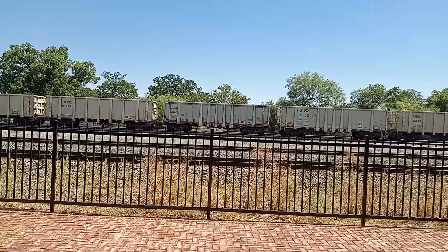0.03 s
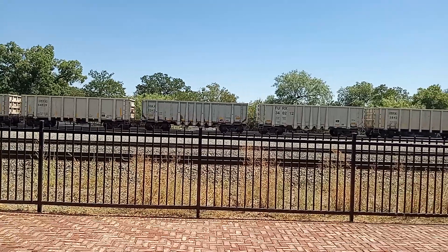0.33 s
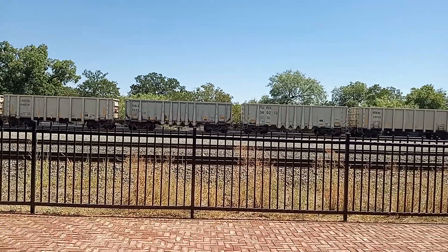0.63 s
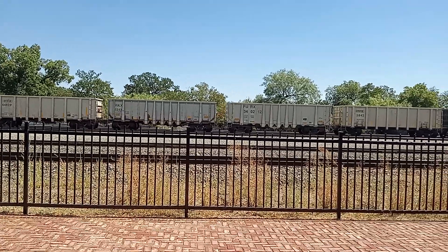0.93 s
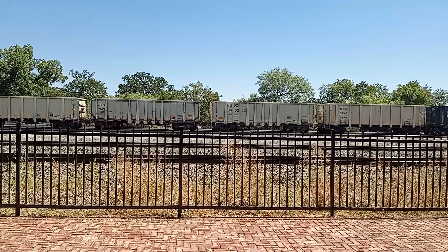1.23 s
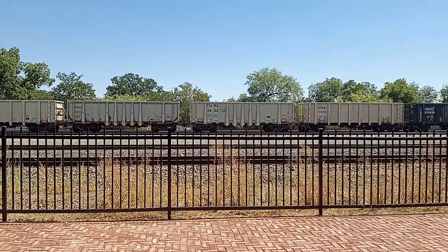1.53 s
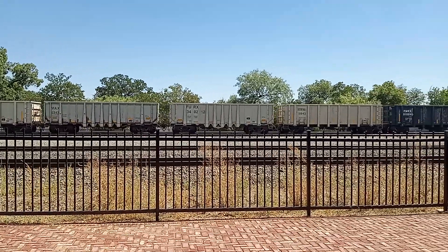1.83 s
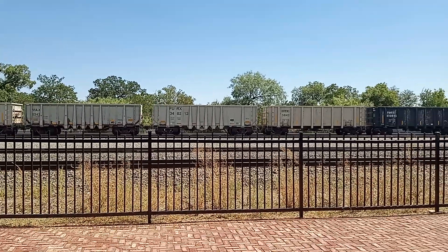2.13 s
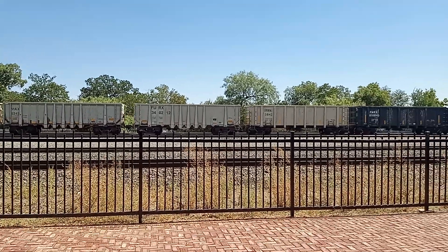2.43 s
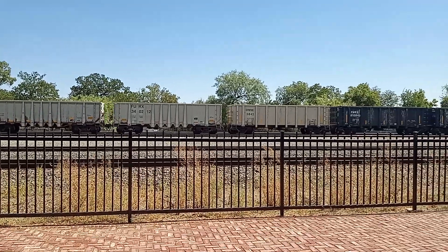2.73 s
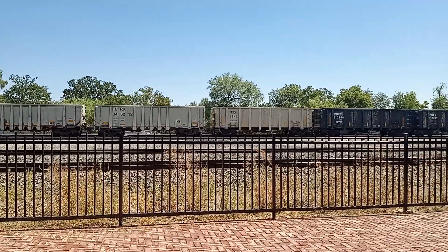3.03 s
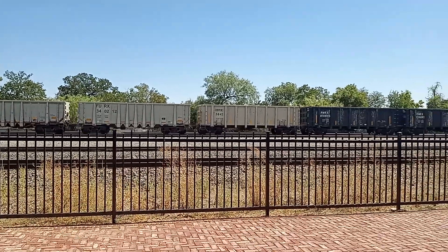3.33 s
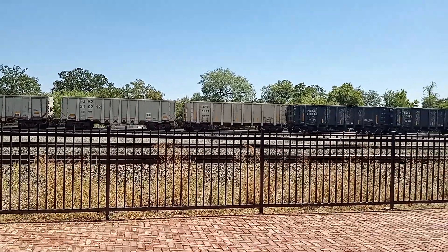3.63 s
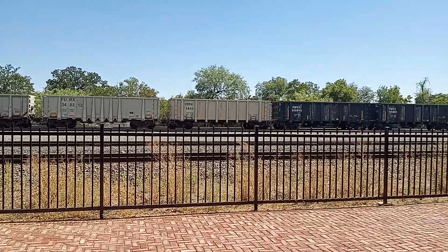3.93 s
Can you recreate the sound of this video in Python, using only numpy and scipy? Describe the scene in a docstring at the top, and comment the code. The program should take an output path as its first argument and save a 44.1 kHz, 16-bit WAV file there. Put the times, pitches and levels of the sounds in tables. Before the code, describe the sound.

A freight train rolls slowly by outdoors, with a steady low rumble and steely wheel hiss throughout. Wheels clack and ring unevenly over a rail joint until about 2.5 seconds, most clearly near 0.8, 1.2, 1.9 and 2.4 seconds. Faint squeaks come near 1.9 seconds and at the end. From about 2.8 seconds, wind gusts buffet the microphone, mostly on the right, over the rumble.

```python
"""Slow freight train behind a fence

A freight train rolls across a rail yard over a bed of wagon rumble and steely wheel hiss.
Rolling wheels sing, flanges squeak faintly and couplings knock. Up front, wheels drop at a
rail joint: the bogie crashes and rattles, the wagon thuds and the wheel rings on.
Towards the end gusts buffet the microphone, mostly its right port."""
import sys
import numpy as np
from scipy import signal
from scipy.fft import rfft, irfft
from scipy.io import wavfile
from scipy.ndimage import uniform_filter1d

SR = 44100
rng = np.random.default_rng(int(sys.argv[2]) if len(sys.argv) > 2 else 0)


def wav_out(sig):
    """Save sig, one row per channel (or a flat mono array), as 16-bit PCM at SR to the path in sys.argv[1]."""
    wavfile.write(sys.argv[1], SR, np.round(np.clip(np.atleast_2d(sig).T, -1, 1) * 32767).astype(np.int16))


N = 176400

# Wind at each microphone port. Each row: time in seconds, level of the buffeting in dB.
LEFT_GUSTS = [(0.35, -64), (.46, -35.5), (.55, -60), (2.4, -56), (2.6, -50), (2.77, -41.5), (2.95, -47.5),
              (3.55, -44), (3.7, -34.5), (3.82, -48.5), (4, -33)]
RIGHT_GUSTS = [(1.4, -51), (1.69, -44.5), (1.745, -27.5), (1.78, -56), (2.05, -41), (2.12, -68),
               (2.83, -42), (2.885, -19.5), (2.94, -29), (3.06, -48), (3.13, -38.5), (3.2, -28.5),
               (3.28, -52), (3.34, -24), (3.41, -24.5), (3.47, -34), (3.52, -30.5), (3.6, -27), (3.76, -35),
               (3.795, -19.5), (3.83, -15), (3.93, -28.5), (3.96, -28), (4, -17.5)]
# Colours of slow and of fast eddies. Each row: frequency in Hz, relative level in dB.
BUFFET_COLOUR = [(12, -52), (25, -31), (45, -17), (80, 0), (130, -4), (200, -13), (300, -26), (600, -55),
                 (3000, -110)]
FLUTTER_COLOUR = [(20, -42), (60, -16), (150, -2), (310, 2), (420, -8), (600, -24), (1000, -43),
                  (2000, -65), (8000, -110)]
# Hard eddies hitting the right port. Each row: time in seconds, peak in dB, width in seconds.
SLAPS = [(2.882, -13, 0.0012), (2.910, -19.5, .0014), (3.378, -16.5, 0.00097), (3.522, -18, 0.0017),
         (3.8, -16.5, 0.00079), (3.816, -18, 0.0012), (3.839, -12, 0.0016), (3.885, -14, 0.00083),
         (3.955, -16.5, 0.001)]
# Colours of wagon rumble and wheel hiss. Each row: frequency in Hz, relative level in dB.
RUMBLE_COLOUR = [(12, -52.5), (25, -29), (35, -5.5), (55, 7), (90, 8.5), (140, 4.5), (200, -5.5),
                 (300, -14), (450, -27), (900, -56), (5000, -100.5)]
ROLLING_COLOUR = [(20, -22), (150, 17), (400, 1.5), (650, 2), (900, -5), (1550, -1.5), (1900, -1.5),
                  (2450, -5.5), (2950, -14.5), (3350, -14), (3850, -15.5), (4400, -14.5), (5600, -18.5),
                  (6800, -25.5), (8200, -36), (13000, -41), (15000, -36.5)]
# Stereo image of the hiss. Each row: frequency in Hz, likeness of left and right from -1 to 1.
ROLLING_LIKENESS = [(300, 0.88), (650, 0.049), (1350, -0.6), (2500, 0.14), (6000, -0.07)]
# Fader ride on the hiss. Each row: time in seconds, level in dB.
ROLLING_FADER = [(0, -51.5), (.4, -49), (.62, -48.5), (.75, -52), (1.5, -46.5), (2.1, -48.5), (2.68, -47),
                 (2.9, -48), (3.15, -50.5), (3.6, -50), (4, -48.5)]
# Wheel modes stirred by rolling. Each row: pitch in Hz, level in dB, pan in dB (positive is left).
SINGING_MODES = [(1001, -65.5, 8), (1492, -69, 11.5), (2300, -90.5, -4.5), (2610, -78, 16.5),
                 (3330, -74, 12), (3790, -69, -8.5)]
# Brief tones of wheels scraping the rail. Each row: typical pitch in Hz, typical level in dB.
GLINTS = [(3400, -76), (3750, -69.5), (4250, -79), (4800, -77), (5500, -75.5), (6500, -87)]
# Flange squeaks. Each row: start and length in seconds, pitch in Hz, level in dB, pan in dB.
SQUEAKS = [(0.1, 0.23, 3730, -63.5, -10), (1.859, 0.082, 5680, -52, -18), (3.703, 0.095, 1520, -57.5, -8),
           (3.878, 0.12, 1556, -62.5, 9), (3.964, 0.052, 2383, -42, -5)]
# Coupling knocks. Each row: start in seconds, level in dB, 60 dB decay time in seconds, pan in dB.
KNOCKS = [(0.599, -49, 0.52, 3), (2.428, -49, 0.13, 8)]
# Colours of a knock, bogie clatter and loose steel. Each row: frequency in Hz, relative level in dB.
KNOCK_COLOUR = [(80, -21), (190, 1.5), (300, 0), (600, 6.5), (900, -53), (3000, -65)]
CLATTER_COLOUR = [(200, -26), (520, 6), (800, -1.5), (1500, -3), (2200, -3), (2900, -14.5), (3400, -8),
                  (4100, -9), (5000, -30.5), (6800, -8.5), (8500, -23), (11000, -27), (13000, -88)]
RATTLE_COLOUR = [(1500, -25), (2400, -3), (2900, -6), (3450, 0.5), (4400, -2.5), (5400, -6.5),
                 (6600, -13.5), (8000, -31), (12000, -38)]
# Modes of a struck wheel. Each row: pitch in Hz, relative level in dB, 60 dB decay time in seconds.
WHEEL_MODES = [(489, -11.5, 0.25), (604, -12, 0.28), (993, -13, 0.17), (1032, -32, 0.34),
               (1496, -5.5, 0.22), (1945, -6, 0.16), (2300, -13, 0.43), (2525, -20, 0.16),
               (3440, -16, 0.48), (4480, -30, 0.52), (4600, -22.5, 0.94), (5300, -31, 0.31),
               (5340, -31, 0.48), (5630, -33, 0.78)]
# Wheels striking the joint. Each row: start in seconds, level of clatter and wheel modes in dB, attack
# in seconds, the clatter's mid and treble trims in dB, then rattle, thud, pan and ping in dB,
# clang pitch in Hz and level in dB, ring pitch in Hz and level in dB, lingering tone in dB.
CLACKS = [(0.026, -59.5, 0.026, 14.5, -11, -55, -44, -1.5, -73, 2470, -52, 3780, -58, -80),
          (0.558, -70, 0.016, 20, -21.5, -71, -44, 2, -80, 1976, -62, 3760, -67, -72),
          (0.753, -39.5, 0.014, 3, -14.5, -47.5, -66, -2.5, -71, 2440, -53, 4030, -43, -68),
          (0.896, -63, 0.014, 10.5, 8, -61, -70, 2, -59, 2250, -57, 5060, -61, -74),
          (1.063, -46.5, 0.03, -0.5, -43, -80, -35.5, -0.5, -70, 1920, -54, 4200, -64, -68),
          (1.226, -44.5, 0.0046, 4, -7, -64, -39.5, 0.5, -72, 1550, -42, 3100, -54, -62),
          (1.786, -53, .027, 3.5, -33, -81, -48, 4, -82, 2770, -59, 3980, -77, -62),
          (1.946, -37, .0061, -6.5, -1, -48, -37.5, 2.5, -52, 1804, -40.5, 2655, -48.5, -58),
          (2.249, -56.5, .015, 9, -21, -76, -75, 2, -76, 2360, -68, 3790, -64, -86),
          (2.415, -36, 0.0068, -3, -1, -58, -49.5, -1.5, -39.5, 2040, -46, 3510, -53.5, -64)]

WAVER_DEPTH, WAVER_PER_S = .47, 90  # unsteadiness of ringing steel
IMPACT_LIKENESS = .26  # knocks and clatter are wide in stereo
MID_HZ, TREBLE_HZ, RING_PAN_DB = 1380, 3600, -10  # a clack's crossovers; its high tones sit right


def undb(db):
    """Decibels to gain."""
    return 10 ** (np.asarray(db) / 20)


def curve(rows):
    """Rows of (seconds, value) joined by straight lines."""
    return np.interp(np.arange(N) / SR, *np.array(rows).T)


def per_bin(rows):
    """Rows of (Hz, value) joined on a log-frequency axis."""
    hz, value = np.array(rows).T
    return np.interp(np.log(np.fft.rfftfreq(N, 1 / SR) + 1), np.log(hz), value)


def unit(x):
    """Scale to rms 1."""
    return x / np.sqrt(np.mean(x ** 2))


def noise(colour):
    """Noise of a given colour, rms 1."""
    return unit(irfft(rfft(rng.standard_normal(N)) * undb(per_bin(colour)), N))


def wide_noise(colour, likeness):
    """Stereo noise: likeness 1 is mono, 0 is wide, -1 is out of phase."""
    mid = rfft(noise(colour)) * np.sqrt(1 + likeness)
    side = rfft(noise(colour)) * np.sqrt(1 - likeness)
    return unit(irfft(np.array([mid + side, mid - side]), N))


def walk(per_s):
    """Smooth random modulation, rms 1."""
    hold = max(int(SR / per_s), 1)
    steps = rng.standard_normal(N)[np.arange(N) // hold]
    return unit(uniform_filter1d(uniform_filter1d(steps, hold), hold))


def split(x, hz):
    """Crossover: the bands below and above a frequency."""
    lowpass = 1 / (1 + (np.fft.rfftfreq(N, 1 / SR) / hz) ** 6)
    low = irfft(rfft(x) * lowpass, N)
    return low, x - low


def pan(db):
    """Stereo gains that put left this many dB above right."""
    return undb(np.array([[db], [-db]]) / 2)


def swell(age, length):
    """Envelope: one smooth fade in and out."""
    return np.sin(np.pi * np.clip(age / length, 0, 1)) ** 2


def blow(age, rise, t60, hold=0):
    """Envelope: attack, hold, then a decay of 60 dB every t60 seconds."""
    attack = np.clip(age / max(rise, 1e-4), 0, 1)
    return attack * np.exp(-np.log(1000) * np.maximum(age - rise - hold, 0) / t60)


def wind(gusts):
    """Eddies buffet one port; the harder the gust, the more fast flutter it carries."""
    db = curve(gusts)
    flutter = unit(noise(FLUTTER_COLOUR) * np.exp(.3 * walk(70)))
    flutter_db = -9 + .35 * (db + 18)  # 9 dB under the buffeting in a full gust of -18 dB
    return undb(db) * (noise(BUFFET_COLOUR) + flutter * undb(flutter_db))


def wind_slaps():
    """A tight eddy crosses the port: a short suction between two softer pushes."""
    t, out = np.arange(N) / SR, 0
    for at, db, width in SLAPS:
        offset = (t - at) / width
        out += undb(db) * (offset ** 2 - 1) * np.exp(-offset ** 2 / 2)
    return out


def wagons():
    """The bed: deep mono rumble of the bodies and the flickering hiss of many rolling wheels."""
    rumble = wide_noise(RUMBLE_COLOUR, likeness=1) * undb(-44 + 2.5 * walk(24))
    low, high = split(wide_noise(ROLLING_COLOUR, per_bin(ROLLING_LIKENESS)), hz=2200)
    hiss = low * undb(3.5 * walk(17)) + pan(-2) * high * undb(1.75 * walk(42))
    return rumble + hiss * undb(curve(ROLLING_FADER))


def wheel_singing():
    """Rolling stirs the wheels' modes: breathy tones that swell, fade and wander in pitch."""
    out = 0
    for hz, db, pan_db in SINGING_MODES:
        phase = 2 * np.pi * np.cumsum(hz * (1 + .015 * walk(9.2))) / SR
        # Fast modulation smears the tone into a narrow band of noise in each ear.
        band = np.array([walk(380) * np.sin(phase) + walk(380) * np.cos(phase) for _ in range(2)])
        out += undb(db) * pan(pan_db) * unit(band * undb(2 * walk(17)))
    return out


def wheel_glints(per_s=20):
    """Now one wheel, now another catches the rail and sings for a moment, each at its own pitch."""
    t, out = np.arange(N) / SR, 0
    count = int(per_s * N / SR)
    waver = np.array([walk(WAVER_PER_S), walk(WAVER_PER_S)])
    for k, (jitter, detune, strength) in enumerate(rng.standard_normal((count, 3))):
        hz, db = GLINTS[k % len(GLINTS)]
        age = t - (k + 2 * jitter) / per_s
        phase = 2 * np.pi * hz * (1 + .035 * detune) * age + np.roll(waver, k * SR // 7, axis=1)
        out += undb(db + 1.5 * strength) * swell(age, length=.1) * np.sin(phase)
    return np.sqrt(2) * pan(-12) * out


def flange_squeaks():
    """A rubbing flange makes one wheel mode swell and fade, rough and unsteady in pitch."""
    t, out = np.arange(N) / SR, 0
    for start, length, hz, db, pan_db in SQUEAKS:
        pitch = hz * (1 + .011 * walk(250))
        tone = np.sin(2 * np.pi * np.cumsum(pitch) / SR) * (1 + .6 * walk(150))
        out += pan(pan_db) * undb(db) * swell(t - start, length) * unit(tone)
    return out


def coupling_knocks():
    """Slack runs through a coupling and the wagon body gives a short, dull boom."""
    t, envelope = np.arange(N) / SR, 0
    for start, db, t60, pan_db in KNOCKS:
        envelope += pan(pan_db) * undb(db) * blow(t - start, rise=.004, t60=t60)
    return wide_noise(KNOCK_COLOUR, IMPACT_LIKENESS) * envelope


def panels(x, spacing_hz=40, depth_db=3.5):
    """The many narrow resonances of a bogie's steelwork, different on every wagon."""
    hz = np.fft.rfftfreq(x.shape[1], 1 / SR)
    knots = rng.standard_normal((2, 1024))
    mid, side = [np.interp(hz / spacing_hz, np.arange(1024), k) for k in knots]
    gain = undb(depth_db * np.array([mid + side / 2, mid - side / 2]))
    return irfft(rfft(x) * unit(gain), x.shape[1])


def steel_mode(age, hz, rise, t60, sag_per_s=.04):
    """One mode, sagging in pitch as the wheel moves on and wavering in each ear with reflections."""
    knots = rng.standard_normal((4, 128))
    drift = np.array([np.interp(np.maximum(age, 0) * WAVER_PER_S, np.arange(128), k) for k in knots])
    cycles = hz * age * (1 - sag_per_s * age / 2) + rng.random()
    phase = 2 * np.pi * cycles + 2 * WAVER_DEPTH * drift[:2]
    return np.sqrt(2) * blow(age, rise, t60) * (1 + WAVER_DEPTH * drift[2:]) * np.sin(phase)


def struck_wheel(age, rise):
    """A blow sets all the wheel's modes ringing; the high ones vary most from wheel to wheel."""
    out = 0
    variations = rng.standard_normal((len(WHEEL_MODES), 2))
    for (hz, db, t60), (detune, strength) in zip(WHEEL_MODES, variations):
        spread, scatter_db, side = (.035, 3, pan(RING_PAN_DB)) if hz > TREBLE_HZ else (.0035, -2, 1)
        mode = steel_mode(age, hz * (1 + spread * detune), rise, t60)
        out += side * undb(1.5 + db + scatter_db * strength) * mode
    return out


def joint_clacks():
    """Each wheel drops at the joint: the bogie crashes and rattles, the wheel rings, the wagon thuds."""
    out = np.zeros((2, N))
    bogie = wide_noise(CLATTER_COLOUR, IMPACT_LIKENESS) * unit(np.exp(.21 * walk(300)))
    body, treble = split(bogie, TREBLE_HZ)
    low, mid = split(body, MID_HZ)
    loose_steel = wide_noise(RATTLE_COLOUR, likeness=0) * unit(np.exp(.25 * walk(200)))
    for (start, db, rise, mid_db, treble_db, rattle_db, thud_db, pan_db, ping_db,
         clang_hz, clang_db, ring_hz, ring_db, linger_db) in CLACKS:
        span = max(int(start * SR), 0) + np.arange(SR)
        age = span / SR - start
        # Noise layers: crash and sharper crack, both with a short echo tail, then the rattle.
        echo = blow(age, rise, t60=.22)
        crash_shape = np.hypot(blow(age, rise, t60=.16, hold=.025), undb(-10.5) * echo)
        crack_shape = np.hypot(blow(age, rise / 4, t60=.11), undb(-15) * echo)
        crash = panels(low[:, span] + undb(mid_db) * mid[:, span]) * crash_shape
        crack = pan(-4) * undb(treble_db) * panels(treble[:, span]) * crack_shape
        rattle = pan(-8.5) * undb(rattle_db) * panels(loose_steel[:, span]) * blow(age, rise, t60=.36)
        # Tonal layers: clang and ring give each wheel its own voice; the thud stays centred.
        wheel = struck_wheel(age, rise)
        clang = undb(clang_db) * steel_mode(age, clang_hz, rise, t60=.24)
        ring = undb(ring_db) * steel_mode(age, ring_hz, rise, t60=.43)
        ping = undb(ping_db) * steel_mode(age, hz=4053, rise=.00096, t60=.15)
        linger = undb(linger_db) * steel_mode(age, hz=3955, rise=rise, t60=1.24)
        thud = undb(thud_db) * steel_mode(age, hz=110.5, rise=.019, t60=.58)[0]
        impact = undb(db) * (undb(.5) * (crash + crack) + wheel)
        tones = clang + pan(RING_PAN_DB) * (ring + ping + linger)
        out[:, span] += pan(pan_db) * (impact + rattle + tones) + thud
    return out


def scene():
    """The mix: the train, with separate wind on each port."""
    train = wagons() + joint_clacks() + coupling_knocks()
    train += wheel_singing() + wheel_glints() + flange_squeaks()
    return train + np.array([wind(LEFT_GUSTS), wind(RIGHT_GUSTS) + wind_slaps()])


def record(dry, top_hz=15500):
    """A steep low-pass takes off the very top."""
    return signal.sosfilt(signal.ellip(8, .2, 70, top_hz, fs=SR, output="sos"), dry)


dry = scene()
out = record(dry)
wav_out(out)
```